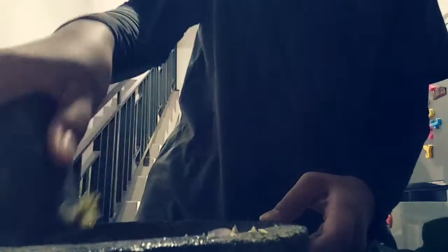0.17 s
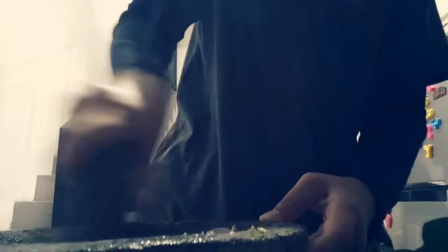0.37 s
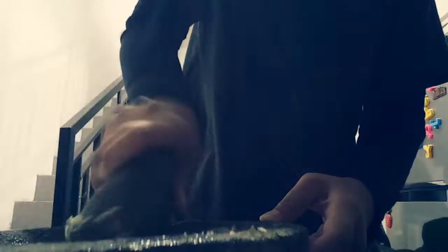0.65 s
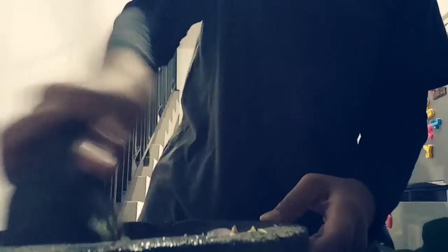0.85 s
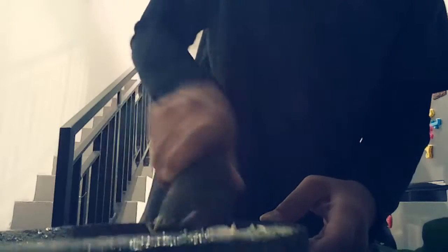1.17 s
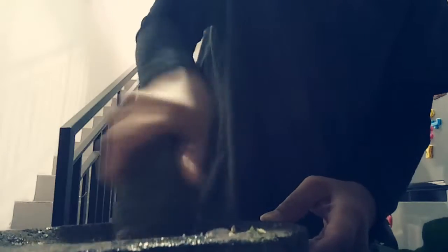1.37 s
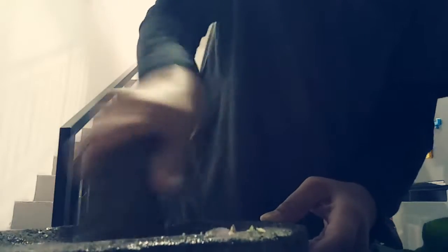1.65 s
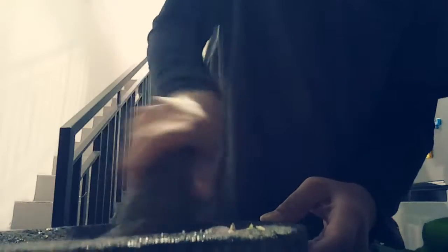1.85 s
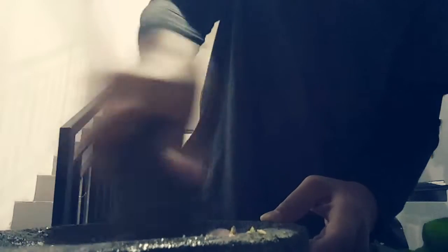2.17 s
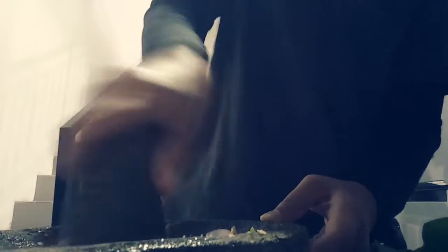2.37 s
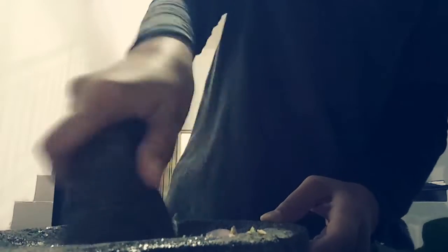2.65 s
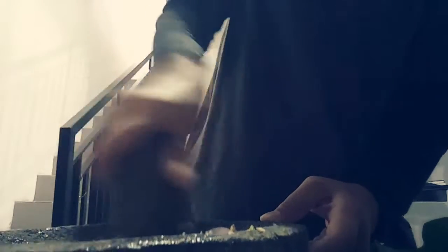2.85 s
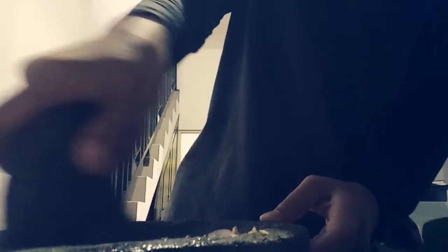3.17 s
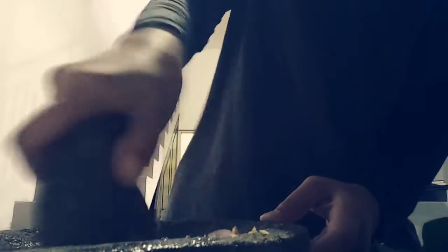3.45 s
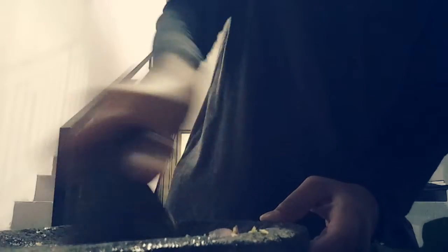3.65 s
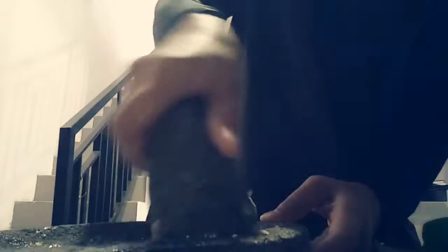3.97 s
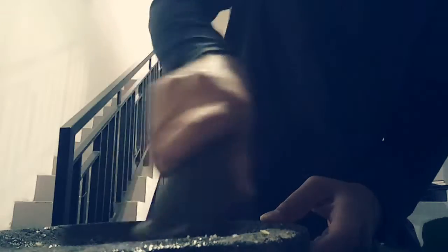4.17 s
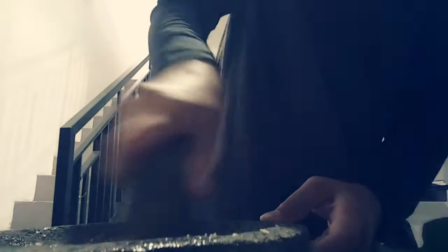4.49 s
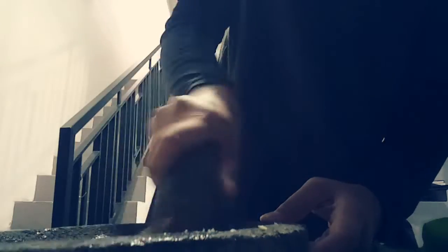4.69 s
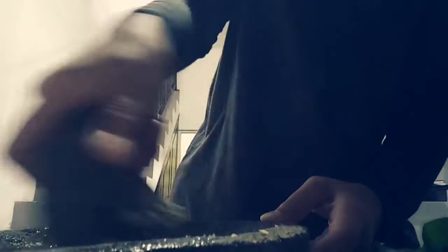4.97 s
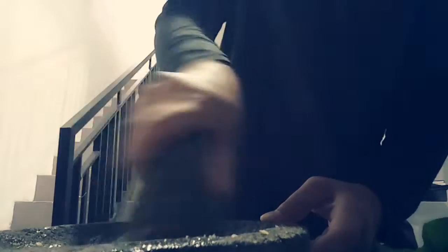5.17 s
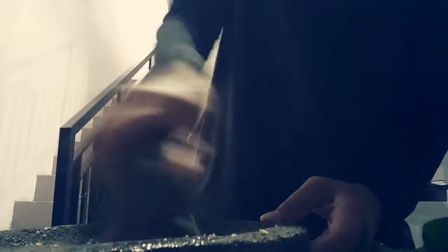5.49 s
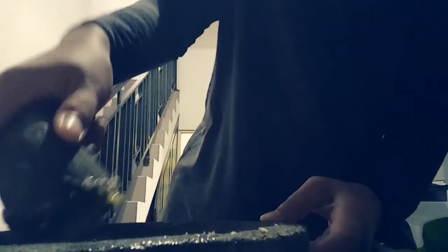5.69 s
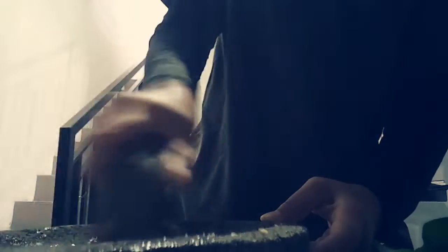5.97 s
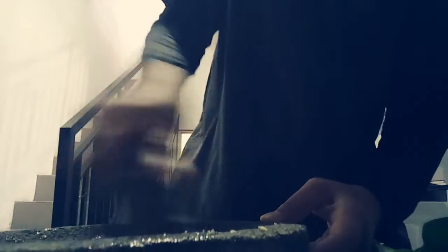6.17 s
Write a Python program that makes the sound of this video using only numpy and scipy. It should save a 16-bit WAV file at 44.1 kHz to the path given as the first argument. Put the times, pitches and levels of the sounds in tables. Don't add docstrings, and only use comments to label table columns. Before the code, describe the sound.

Close to a stone mortar in a hard-walled kitchen, over a very low hush. Light gritty pushes and a seed crack open the scene. At 0.4 s the pestle drops hard with a bright hollow stone knock, rebounding at 0.6 s; small scrapes and squeaks follow. Another full knock lands at 1.3 s, then grinding with sparse cracks. A soft landing at 2.3 s brings clusters of tiny pops, crunches and light taps until about 3 s. A full, duller knock at 3.3 s has a faint bounce at 3.7 s. The hardest blow, short and damped, hits at 4.2 s with a quick second knock and longer grinding. At 5.1 s a ringing drop rattles through several fast rebounds, then seeds crackle busily from 5.4 to 5.9 s. A last soft drop at 6.1 s ends in gritty rubbing. Blows stir a low counter thrum and a slight short echo.

```python
import sys
import numpy as np
from scipy import signal
from scipy.fft import rfft, irfft
from scipy.io import wavfile
from scipy.ndimage import uniform_filter1d

SR = 44100
rng = np.random.default_rng(int(sys.argv[2]) if len(sys.argv) > 2 else 0)


def field_ratio(decibels):
    return 10 ** (np.asarray(decibels, dtype=float) / 20)


def to_wav(s):
    ch = np.atleast_2d(s).T
    pcm = np.round(np.clip(ch, -1, 1) * 32767)
    wavfile.write(sys.argv[1], SR, pcm.astype(np.int16))


N = 279153
T = np.arange(N) / SR

# (time [s], peak [dB], deep share [dB], bright share [dB], ring length factor [1])
BLOWS = [
    (0.4158, -2, -21, -18, 1),
    (0.578, -4, -23.5, -30, 0.47),
    (1.3114, -4.5, -15.5, -15.5, 1),
    (2.288, -16.5, -21.5, -31.5, 0.56),
    (3.2714, -4.5, -19, -25.5, 0.55),
    (3.685, -19.5, -23, -18, 0.83),
    (4.2224, 0.5, -23.5, -16.5, 0.28),
    (5.0619, -7.5, -18.5, -20.5, 1),
    (5.159, -16.5, -12.5, -15, 0.49),
    (6.0916, -12.5, -16, -17.5, 0.69),
]
# (time [s], peak [dB], deep share [dB], bright share [dB])
KNOCKS = [(0.4204, -6, -24, -12), (0.5821, -10, -41, -24), (1.32, -23, -17, 1), (1.354, -22, -26, -6),
          (1.395, -18.5, -26, -31), (2.274, -35, -7, -5), (2.318, -20.5, -26.5, -27.5),
          (2.373, -22, -19.5, -21), (2.614, -31, -15, -24), (2.665, -26.5, -11.5, -11.5),
          (2.594, -36, -17, -27), (2.685, -27.5, -9, -8), (2.716, -37.5, -29, -17), (2.779, -40, -24, -22),
          (2.953, -31.5, -21.5, -16), (2.968, -30, -17, -13), (2.985, -39.5, -5, -22),
          (3.013, -42, -18, -13), (3.716, -28.5, -8, -14), (1.493, -32, -16, -15), (6.102, -18, -14.5, -19),
          (3.284, -15.5, -18, -15), (3.3, -18, -3.5, -25), (3.335, -23, -20, -14), (3.358, -23, -8, -14),
          (3.311, -16, -14, -17), (3.701, -19.5, -18, -19), (4.241, -18.5, 4, -38),
          (4.265, -6.5, -22.5, -23), (4.492, -27, -15, -31), (5.0722, -2.5, -17.5, -27),
          (5.171, -16, -14, -26), (5.077, -18.5, -12, -30), (5.18, -6, -17, -22), (5.206, -28, -1, -11),
          (5.1883, -5.5, -23, -22), (5.757, -33.5, -10, -16)]
# (time [s], favoured mode [Hz], boost [dB], damped mode [Hz], cut [dB])
SPOTS = [(.41, 1984, 6, 405, -8.5), (.57, 704, 11.5, 1640, -5.5), (1.3, 897, 16, 1090, -2.5),
         (2.26, 1090, -3.5, 400, 1.5), (2.6, 404, 9, 1096, 0.5), (3.26, 1100, 4, 400, -10),
         (3.68, 644, 6.5, 400, 2.5), (4.2, 1037, 4, 740, 0), (5.05, 2000, 18, 1107, 7),
         (5.07, 850, 9, 1064, 3.5), (5.15, 1940, 16, 650, 5), (5.165, 1070, 0.5, 670, -3),
         (5.7, 1160, -1, 650, -6), (6.08, 618, 8, 402, -4.5)]
# (frequency [Hz], level [dB], t60 [s])
BOWL_MODES = [(263.8, -13.5, 0.1), (386.1, 4, 0.23), (508, 5.5, 0.1), (638.2, 6.5, 0.11),
              (685, 10.5, 0.051), (759, -0.5, 0.26), (884, -16.5, 0.25), (850, -5.5, 0.014),
              (1116, -4.5, 0.11), (1067.6, 1.5, 0.068), (1304, -4.5, 0.058), (1341, -7, 0.11),
              (1574, -5.5, 0.11), (1777, 1.5, 0.018), (1945, -2, 0.065), (2283, -7, 0.053),
              (2542, -9.5, 0.066), (2826, -9, 0.028)]
# (time [s], length [s], frequency [Hz], level [dB])
JUDDERS = [(.425, .15, 1930, -37.5), (0.436, .1, 945, -30), (1.333, 0.11, 898, -36),
           (1.346, 0.058, 1880, -37), (5.11, 0.069, 1916, -49), (5.194, .19, 1935, -52.5),
           (5.487, 0.041, 1930, -49.5), (3.299, 0.24, 638, -48), (3.687, 0.047, 648, -35),
           (4.239, .012, 1290, -17.5), (3.271, .014, 1118, -19.5)]
# (time [s], length [s], crunch level [dB], rub level [dB], fine grit level [dB])
STROKES = [(0.0, 0.048, -43.5, -40.5, -49.5), (0.15, 0.034, -50, -51.5, -48.5),
           (0.437, 0.042, -58, -43, -56.5), (0.521, 0.035, -45, -38, -52.5),
           (0.699, 0.028, -50, -44.5, -58), (0.867, 0.058, -53, -52.5, -57.5),
           (0.948, 0.032, -53.5, -66.5, -56), (1.37, 0.078, -51.5, -42, -58),
           (1.456, 0.092, -46.5, -50, -58.5), (1.576, 0.02, -52.5, -68, -55.5),
           (1.675, 0.044, -49.5, -67, -58), (1.815, 0.11, -51.5, -51, -59),
           (2.269, 0.026, -72, -45.5, -53.5), (2.36, 0.045, -42.5, -45.5, -49),
           (2.438, 0.047, -61, -74, -62.5), (2.565, 0.013, -42.5, -57, -50),
           (2.661, 0.061, -45, -51.5, -49.5), (2.73, .05, -59.5, -60, -63), (2.821, 0.041, -50.5, -55, -55),
           (2.942, 0.078, -50, -65.5, -55.5), (3.255, 0.019, -42.5, -58.5, -45.5),
           (3.38, 0.097, -50, -46.5, -54.5), (3.565, 0.025, -46, -45, -52), (3.654, 0.073, -50, -72, -53),
           (3.815, 0.12, -47.5, -56, -52), (3.988, 0.017, -55.5, -67.5, -68),
           (4.182, 0.015, -79.5, -70, -60.5), (4.244, 0.17, -47, -42.5, -53.5),
           (4.49, 0.14, -52.5, -48.5, -58), (4.633, 0.039, -44.5, -61.5, -51.5),
           (4.74, 0.014, -62.5, -50.5, -52), (5.165, 0.035, -41, -40, -47.5),
           (5.257, 0.11, -52, -45, -54.5), (5.443, 0.085, -50, -50, -50.5), (5.575, 0.05, -56, -50.5, -52),
           (5.715, 0.036, -44, -53.5, -49.5), (5.835, 0.05, -50.5, -46, -53.5),
           (6.072, 0.025, -66, -80, -57.5), (6.126, 0.081, -50, -45.5, -52.5),
           (6.274, 0.035, -46.5, -48.5, -52.5)]
LANDINGS_S = [
    0,
    .409,
    1.302,
    2.27,
    3.257,
    4.196,
    5.046,
    6.066,
]
# (frequency [Hz], level [dB per Hz])
RUB_SPECTRUM = [(88, -27.5), (150, -2), (263, 4.5), (305, -25), (392, 4.5), (688, -4.5), (901, -15),
                (1090, -10.5), (2180, -45.5), (3200, -63), (4160, -33), (7040, -120)]
# (frequency [Hz], level [dB per Hz])
GRIT_SPECTRUM = [(1290, -24.5), (2200, -31.5), (2700, -9), (3500, 1.5), (4490, 5.5), (5200, -11.5),
                 (6200, 0), (7300, -7), (8300, -15), (9900, -9.5), (11500, -18.5), (13000, -27.5),
                 (14000, -53.5)]
# (time [s], length [s], level [dB])
SCUFFS = [(5.558, 0.083, -61), (2.733, 0.068, -59), (.41, .005, -55), (1.307, .006, -53),
          (1.473, 0.14, -53.5), (2.885, 0.036, -59), (4.323, 0.17, -58), (4.608, 0.25, -69),
          (0.856, 0.037, -67.5), (0.904, 0.051, -53), (1.698, 0.024, -58), (1.822, 0.13, -56),
          (2.278, .02, -56), (2.589, 0.024, -51.5), (2.666, 0.054, -45), (2.943, 0.034, -52),
          (3.698, 0.026, -38.5), (4.217, 0.022, -44.5), (4.49, 0.029, -47.5), (5.04, 0.014, -54),
          (5.178, 0.008, -48), (5.743, 0.052, -49.5)]
# (frequency [Hz], level [dB per Hz])
SCUFF_SPECTRUM = [(150, -19), (300, 7), (700, -4.5), (1200, -4), (1900, -11), (3000, -28), (5000, -56.5)]
# (time [s], peak [dB], centre [Hz])
CRACKS = [(0.029, -23, 3920), (0.155, -29, 4200), (1.717, -31, 4300), (0.964, -41, 4570),
          (1.4035, -27.5, 4000), (1.808, -62, 3450), (1.9112, -33.5, 2510), (2.272, -38, 4060),
          (2.37, -26.5, 4300), (2.433, -38, 4000), (2.573, -32, 4150), (2.6494, -29.5, 3950),
          (2.827, -54, 4020), (2.8624, -29, 4470), (2.938, -61, 4300), (3.258, -28, 4120),
          (3.446, -33.5, 3450), (3.573, -27, 4060), (3.827, -31, 4200), (3.918, -35.5, 4400),
          (4.325, -24, 3920), (4.6314, -22.5, 2620), (4.7335, -24, 4120), (5.3244, -36, 3700),
          (5.444, -28.5, 3850), (5.559, -30, 4310), (5.6924, -26.5, 4380), (5.793, -40, 4200),
          (5.842, -36, 2800), (6.3065, -26, 4230)]
# (time [s], peak [dB])
PIPS = [(.872, -55), (1.868, -30.5), (2.729, -42), (2.77, -40), (2.881, -32), (3.571, -31), (4.597, -30),
        (5.46, -27.5), (5.574, -24), (5.721, -29), (5.758, -36), (6.085, -44)]
# (time [s], peak [dB])
TICKS = [(0.0182, -42.5), (0.054, -36.5), (0.1563, -35.5), (0.5605, -39), (0.909, -35), (0.9665, -34),
         (1.4693, -52), (1.523, -41), (1.5434, -36), (1.714, -59.5), (1.8257, -65), (1.8392, -40),
         (1.892, -49.5), (2.45, -31), (2.5671, -55.5), (2.5857, -36), (2.7056, -35.5), (2.773, -33),
         (2.825, -36), (3.0054, -50), (2.8626, -41), (5.0605, -28), (5.2175, -40), (5.26, -46),
         (3.5829, -36), (3.6717, -47), (3.8296, -24.5), (3.8647, -44), (3.8863, -40.5), (3.8934, -57),
         (3.903, -44), (3.988, -55), (4.2048, -43.5), (4.3039, -45), (4.578, -55), (5.569, -25),
         (5.6434, -42), (5.794, -69), (5.8385, -36)]
# (time [s], peak [dB])
POPS = [(2.3346, -37), (2.3457, -38), (2.3738, -36), (2.385, -31), (2.4352, -39), (2.6474, -37),
        (2.8634, -41), (2.882, -43), (4.375, -36), (4.6588, -42.5), (5.437, -32), (5.4456, -37),
        (5.452, -27), (5.4597, -32), (5.5586, -39), (5.5775, -33), (5.696, -39), (5.717, -37),
        (5.728, -34.5), (5.736, -39), (5.7595, -37.5), (5.7946, -32), (5.859, -36), (6.1935, -48),
        (6.2034, -39), (0.1342, -42)]
# (time [s], length
# [s], frequency [Hz], level [dB])
SQUEAKS = [(.685, .042, 3590, -55), (.69, .03, 6200, -62), (.821, .05, 3570, -60), (.834, .025, 6170, -62),
           (.861, .02, 2320, -58), (.988, .022, 4480, -53), (.998, .16, 2770, -74), (.99, .22, 5700, -79),
           (2.258, .03, 4130, -64), (2.692, .025, 6280, -56), (2.71, .03, 3500, -55),
           (5.785, .025, 1130, -51), (5.748, .025, 1170, -47), (5.156, .054, 4200, -43),
           (5.061, .016, 4050, -37), (5.165, .04, 3450, -48), (4.195, .03, 3900, -64),
           (6.075, .015, 4070, -64), (.908, .016, 1200, -47), (.93, .02, 1200, -50),
           (6.306, .012, 4300, -48), (5.1, .03, 4180, -52), (3.27, .02, 2150, -36), (2.56, .04, 4100, -50),
           (5.158, .015, 2000, -30), (5.172, .028, 1100, -27), (1.8, .03, 3600, -56),
           (5.58, .085, 3550, -58), (.27, .13, 5900, -73), (2.03, .2, 4700, -72), (5.87, .05, 3550, -59),
           (.581, .012, 1100, -27), (.577, .012, 1911, -26), (5.752, .02, 1390, -51),
           (2.905, .02, 1150, -62), (.418, .015, 3900, -38), (1.312, .015, 3700, -40)]
# (time [s], thrum level [dB], panel level [dB])
SHOVES = [(0.08, -41.5, -50), (.445, -33.5, -37), (.53, -27.5, -55), (.6, -42, -27), (.73, -43, -40),
          (0.948, -41, -39.5), (1.341, -36.5, -25.5), (1.42, -34, -36.5), (1.73, -42, -50.5),
          (1.9, -49, -47.5), (2.295, -32.5, -42), (2.401, -36.5, -42.5), (2.62, -45, -39), (2.71, -38, -41),
          (3.0, -41.5, -39), (3.291, -31.5, -39), (3.42, -39, -53), (3.741, -36.5, -45.5),
          (3.86, -56.5, -46), (4.255, -29.5, -48), (4.52, -37.5, -47), (4.62, -40, -59),
          (5.095, -30, -30.5), (5.2, -28, -54), (5.39, -44.5, -47), (5.629, -49, -47), (5.791, -50, -39.5),
          (6.113, -45, -42.5), (6.2, -35.5, -58), (6.32, -44, -68)]
# (frequency [Hz], width [Hz], level [dB])
THRUM_MODES = [(93.36, 5.4, -1), (128, 63, -14)]
# (frequency [Hz], width [Hz], level [dB])
PANEL_MODES = [(204.2, 7.5, -5.5), (264.9, 4.5, 0.5)]
# (centre [Hz], t60 [s], level [dB])
ROOM_BANDS = [(167, 0.62, -11.5), (506.7, 0.4, -17.5), (975, 0.62, -26.5), (2270, 0.4, -18), (4200, 1, -29),
              (9900, 0.17, -13.5)]
# (frequency [Hz], level [dB])
HUSH_SPECTRUM = [(15, -36.5), (25, -28.5), (102, 14.5), (286, -12), (934, -34), (1140, -27), (1220, -45.5),
                 (1320, -23.5), (2100, -22), (3200, -30), (4190, -26.5), (4860, -21.5), (5240, -66),
                 (6070, -41.5), (9000, -33), (13000, -45), (13700, -87.5), (19800, -120)]


def blows():
    knock_ring = 0.65
    bite_db, bite_slope = -27, 0.93
    spot_width = .13
    out, t = np.zeros(N), T[:int(.18 * SR)]
    hz, db, t60 = np.array(BOWL_MODES).T[:, :, None]
    late = t - .0011
    slap = -np.cos(2 * np.pi * 1200 * late) * np.exp(-(late / 0.0016) ** 2)

    def closeness(centre_hz):
        return np.exp(-(np.log(hz / centre_hz) / spot_width) ** 2)

    hits = sorted(BLOWS + [row + (knock_ring,) for row in KNOCKS])
    for s, peak_db, deep_db, bright_db, free in hits:
        detune, turn, strength = rng.standard_normal((3, len(BOWL_MODES), 1))
        noise = rng.standard_normal(len(t))
        chatter = rng.standard_normal((len(BOWL_MODES), len(t) // 64 + 1))
        chatter = uniform_filter1d(chatter, 6, axis=1).repeat(64, axis=1)
        chatter = uniform_filter1d(chatter, 128, axis=1)[:, :len(t)] * np.minimum(t / .01, 1)

        hard = np.clip((peak_db + 11) / 8, 0, 1)
        phase = 2 * np.pi * hz * (1 + .008 * detune) * late
        phase = phase + (2.5 - 1.4 * hard) * turn + 1.9 * chatter

        tilt_db = np.interp(hz, [830, 882, 1400, 1490], [deep_db + 9.5, 0, 0, bright_db + 11.5])
        _, favoured_hz, boost_db, damped_hz, cut_db = [row for row in SPOTS if row[0] <= s][-1]
        spot_db = 1.5 * strength + boost_db * closeness(favoured_hz) + cut_db * closeness(damped_hz)
        decay_db = 60 * t / (t60 * max(free, .2))

        ring = -(field_ratio(db + tilt_db + spot_db - decay_db) * np.cos(phase)).sum(axis=0)
        ring *= 1 - np.exp(-(t / .0007) ** 2)
        ring = ring / np.abs(ring).max() + field_ratio(-11.5) * hard * slap
        bite_now_db = bite_db + (bite_slope - 1) * peak_db
        bite = unit(band(noise, 2300, 5200)) * field_ratio(bite_now_db - 7 - 60 * t / .05)
        add(out, s, field_ratio(peak_db - 3.5) * (ring / np.abs(ring).max() + bite))
    return out


def judders():
    throb_hz, throb_depth, wander_rad, fade_db = 75, .75, .9, 9
    out = np.zeros(N)
    for s, length, hz, db in JUDDERS:
        t = T[:int(length * SR)]
        drift = [np.interp(t, T[:300] * 220, row) for row in rng.standard_normal((2, 300))]
        pitch_wander, throb_wander = wander_rad * np.array(drift)
        throb = 1 + throb_depth * np.sin(2 * np.pi * throb_hz * t + throb_wander)
        ring = np.sin(2 * np.pi * hz * t + pitch_wander) * throb
        add(out, s, ring * field_ratio(db - fade_db * t / length) * signal.windows.tukey(len(t), .2))
    return out


def grinding():
    s, length, crunch_db, rub_db, fine_db = np.transpose(STROKES)
    hit_s, hit_db = np.transpose(BLOWS)[:2]

    splash = humps(hit_s, 0.0064, hit_db - 40.5, 5000, 500)
    press = humps(s, length, crunch_db, 497, 300.5) + splash
    sift = humps(s, length, fine_db, 800, 451) + field_ratio(-16.0) * splash
    sift = sift + humps(s, length, fine_db - 8.5, 800, 159.5)

    grit = colour(unit(grains(1500, 5.0)) + .4 * rng.standard_normal(N), GRIT_SPECTRUM)
    coarse = patchy(grit, 2000, 5300, count=4, patchy_db=1.2, rate=45)
    fine = patchy(grit, 5300, 13300, count=5, patchy_db=1.4, rate=45)
    pressure_db = 2.0 * flicker(120)
    crunch = field_ratio(pressure_db - 6.0) * (press * coarse + sift * fine)

    drag = grains(900, 1.7)
    ringing = np.zeros(N)
    for hz, db, _ in BOWL_MODES[1:15]:
        shift_db = 4.5 * flicker(25)
        ringing += field_ratio(db + shift_db) * band(drag, hz * .95, hz * 1.05, order=1)
    rub = unit(unit(colour(drag, RUB_SPECTRUM)) + 0.47 * unit(ringing))
    rub = rub * field_ratio(-2.5 + 1.8 * flicker(38)) * humps(s, length, rub_db, 303, 222)
    return crunch + rub


def scuffs():
    s, length, db = np.transpose(SCUFFS)
    scrape = colour(grains(1700, 3.0), SCUFF_SPECTRUM)
    rough = patchy(scrape, 181, 2940, count=6, patchy_db=5.5, rate=13)
    return rough * humps(s, length, db, 1000, 420)


def splits():
    pips = [row + (4300,) for row in PIPS]
    crushed = [(row[0], row[1] - 17.5, 2870) for row in BLOWS]
    return sorted(CRACKS + pips + crushed)


def cracks():
    out, t = np.zeros(N), T[:int(.08 * SR)]
    for s, peak_db, hz in splits():
        noise = rng.standard_normal((2, len(t)))
        grit = unit(band(noise[0], 3000, 8800))
        tick = grit * (1.3 * np.exp(-t * 800) + .3 * np.exp(-t * 200)) * (1 - np.exp(-t * 3000))
        patter = unit(band(noise[1], .85 * hz, 1.12 * hz)) * np.exp(-t / .008)
        add(out, s, field_ratio(peak_db - 17.5) * (tick + field_ratio(2.0) * patter))
    return out


def snaps():
    out, t = np.zeros(N), T[:400]
    for s, peak_db in TICKS:
        click = unit(band(rng.standard_normal(len(t)), 3300, 10000)) * np.exp(-t / 0.0023)
        add(out, s, field_ratio(peak_db - 10.5) * click)
    return out


def pops():
    pop_hz, pop_s = 4300, 0.00095
    out, t = np.zeros(N), T[:300]
    for s, peak_db in POPS:
        detune, overtone = rng.standard_normal(2)
        cycle = 2 * np.pi * pop_hz * (1 + .06 * detune) * t
        ping = np.sin(cycle) + 0.28 * np.sin((1.5 + 0.45 * overtone) * cycle)
        add(out, s, field_ratio(peak_db - 1.0) * ping * np.exp(-t / pop_s))
    return out


def squeaks():
    out = np.zeros(N)
    for s, length, hz, db in SQUEAKS:
        n = int(length * SR)
        lo_hz = (1 - 0.01 / length ** .5) * hz
        hi_hz = (1 + 0.0057 / length ** .5) * hz
        whistle = band(rng.standard_normal(SR // 2), lo_hz, hi_hz)[-n:]
        add(out, s, field_ratio(db) * unit(whistle) * np.sqrt(np.hanning(n)))
    return out


def counter():
    shove_s, rise_db_s = .04, 1100
    s, thrum_db, panel_db = np.transpose(SHOVES)
    out = np.zeros(N)
    for modes, level_db, fall_db_s in ((THRUM_MODES, thrum_db, 106.5), (PANEL_MODES, panel_db, 177.5)):
        shake = rng.standard_normal(N)
        ring = np.zeros(N)
        for hz, width, db in modes:
            ring += field_ratio(db) * unit(band(shake, hz - width / 2, hz + width / 2, order=1))
        out += humps(s - shove_s / 2, shove_s, level_db - 6.5, rise_db_s, fall_db_s) * ring
    return band(out, 51, 440, order=1)


def room(x):
    t = T[:int(.8 * SR)]
    tail = np.zeros(len(t))
    for hz, t60, db in ROOM_BANDS:
        tail += field_ratio(db - 60 * t / t60) * band(rng.standard_normal(len(t)), hz / 1.43, hz * 1.26)
    return signal.fftconvolve(x, field_ratio(-18.5) * tail * (1 - np.exp(-t / 0.00083)))[:N]


def hush():
    return unit(colour(rng.standard_normal(N), HUSH_SPECTRUM)) * field_ratio(-62.5)


def humps(start, length, db, rise_db_s, fall_db_s):
    t = T[::64, None]
    slope_db = rise_db_s * np.maximum(start - t, 0) + fall_db_s * np.maximum(t - start - length, 0)
    down = np.array(LANDINGS_S)
    landed = t >= down[np.maximum(np.searchsorted(down, start + .03) - 1, 0)]
    power = (landed * field_ratio(db - slope_db) ** 2).sum(axis=1)
    return np.interp(T, t[:, 0], np.sqrt(power))


def patchy(x, lo_hz, hi_hz, count, patchy_db, rate):
    edges = np.geomspace(lo_hz, hi_hz, count + 1)
    return unit(sum(band(x, a, b) * field_ratio(patchy_db * flicker(rate)) for a, b in zip(edges, edges[1:])))


def grains(rate, scatter_db):
    hit = rng.random(N) < rate / SR
    size = field_ratio(scatter_db * np.minimum(rng.exponential(size=N), 3.0))
    return np.sign(rng.standard_normal(N)) * hit * size


def flicker(rate):
    k = max(int(SR / 16 / rate), 1)
    coarse = uniform_filter1d(uniform_filter1d(rng.standard_normal(N // 16 + 2), k), k)
    return unit(np.interp(np.arange(N) / 16, np.arange(len(coarse)), coarse))


def unit(x):
    return x / np.sqrt(np.mean(x ** 2))


def colour(x, points):
    hz, db = np.transpose(points)
    log_f = np.log(np.arange(len(x) // 2 + 1) * SR / len(x) + 1)
    return irfft(rfft(x) * field_ratio(np.interp(log_f, np.log(hz), db)), len(x))


def band(x, lo_hz, hi_hz, order=2):
    return signal.sosfilt(signal.butter(order, [lo_hz, hi_hz], "band", fs=SR, output="sos"), x)


def add(out, s, x):
    i = int(s * SR)
    out[i:i + len(x)] += x[:N - i]


def scene():
    near = blows() + judders() + grinding() + scuffs() + cracks() + snaps() + pops() + squeaks()
    return np.tile(near + room(near) + counter() + hush(), (2, 1))


def band_limit(x):
    return signal.sosfilt(signal.butter(12, 14240, fs=SR, output="sos"), x)


def record(dry):
    dry = signal.sosfilt(signal.ellip(8, .2, 32, 13250, fs=SR, output="sos"), dry)
    scrambled = band(dry[0], 3500, 13000, order=4) * flicker(700)
    ticks = np.array(splits())[:, 0]
    calm = T - ticks[np.searchsorted(ticks, T + .012) - 1] > .009
    edges_hz = [4200, 5100, 5700, 6900, 8300, 9600, 11000, 13200]
    thresholds = [.5, 0, -.6, -.8, -.7, -.7, -.6]
    mood = flicker(20)
    side = np.zeros(N)
    for threshold, lo_hz, hi_hz in zip(thresholds, edges_hz, edges_hz[1:]):
        is_open = calm & (.7 * mood + .7 * flicker(20) > threshold)
        gate = uniform_filter1d(1. * is_open, 400)
        side += gate * band(scrambled, lo_hz, hi_hz, order=4)
    side = colour(side, [(3900, -80), (4200, -7), (8000, -5), (13200, -2)])
    mix = dry + np.array([side, -side])
    return band_limit(mix)


dry = scene()
out = record(dry)
to_wav(out)
```